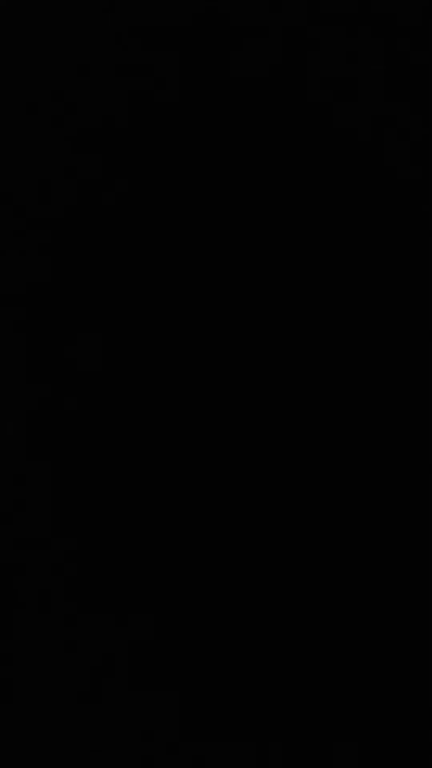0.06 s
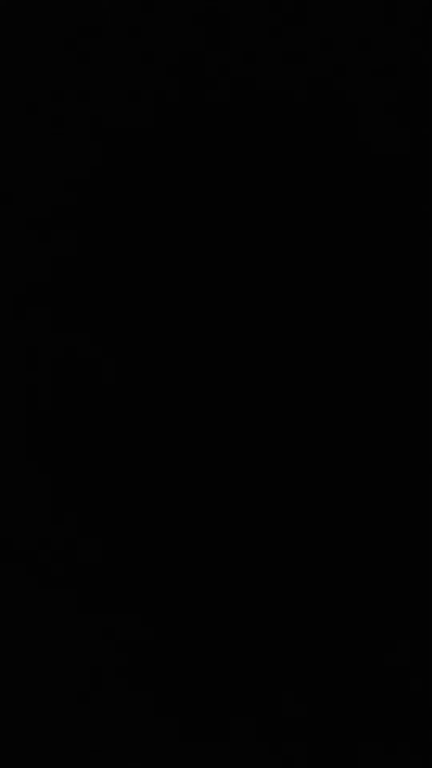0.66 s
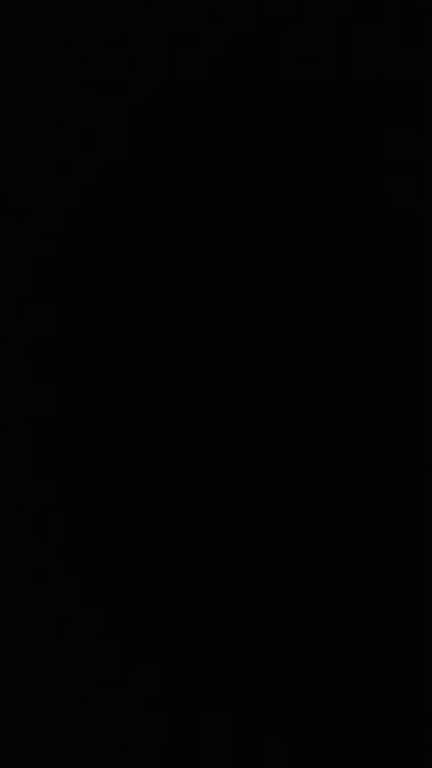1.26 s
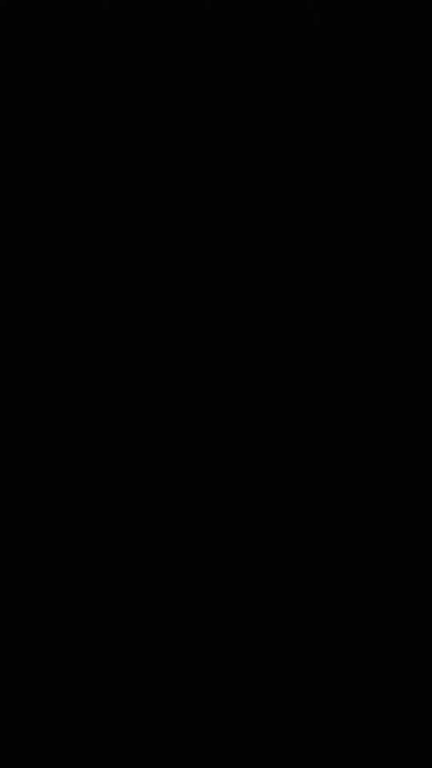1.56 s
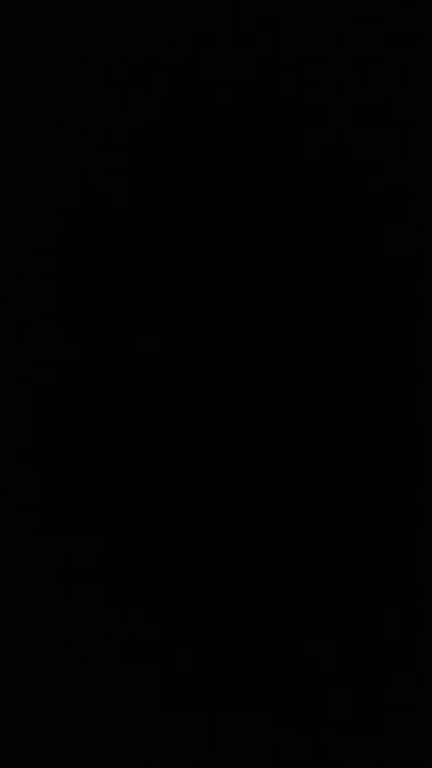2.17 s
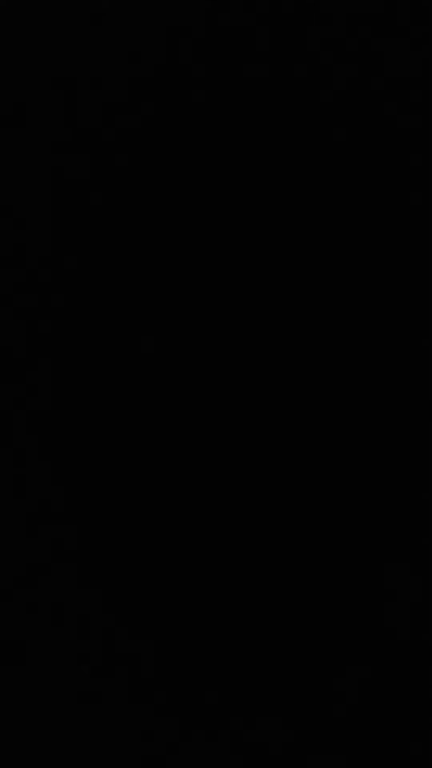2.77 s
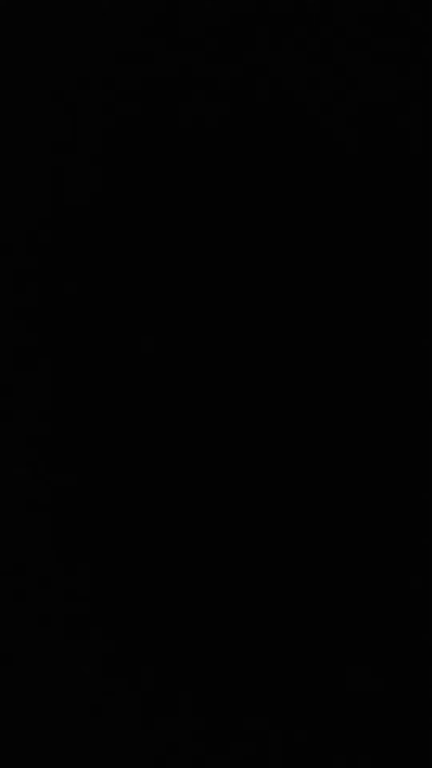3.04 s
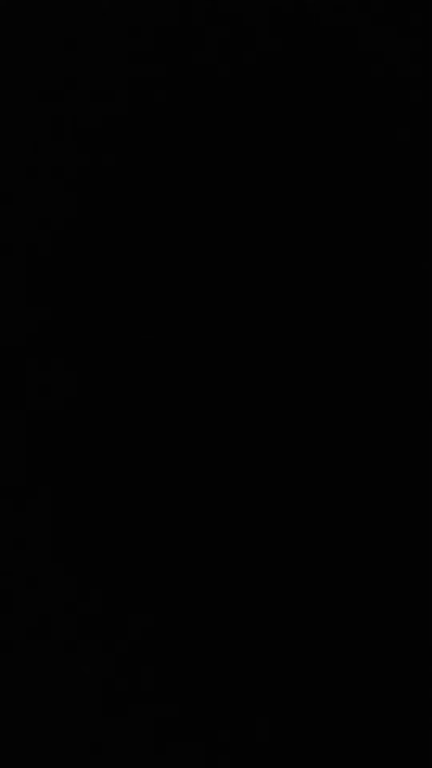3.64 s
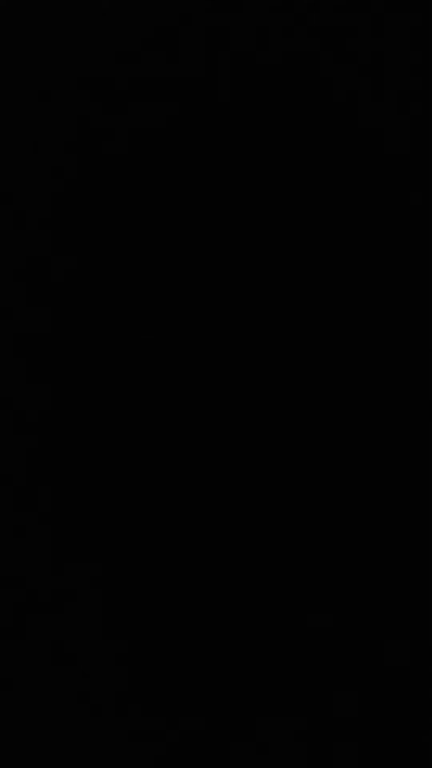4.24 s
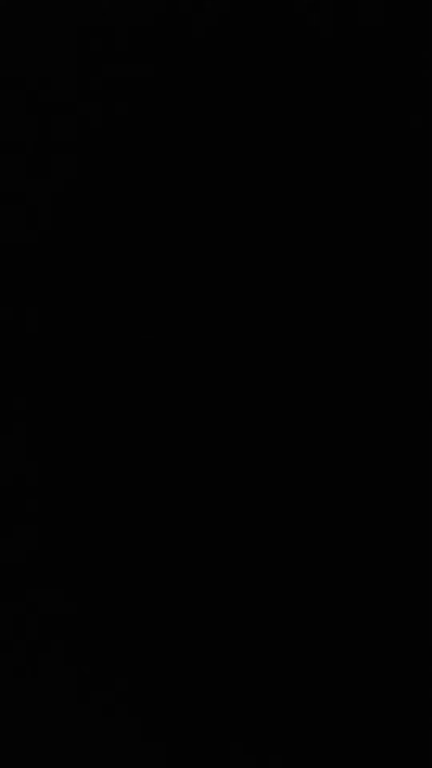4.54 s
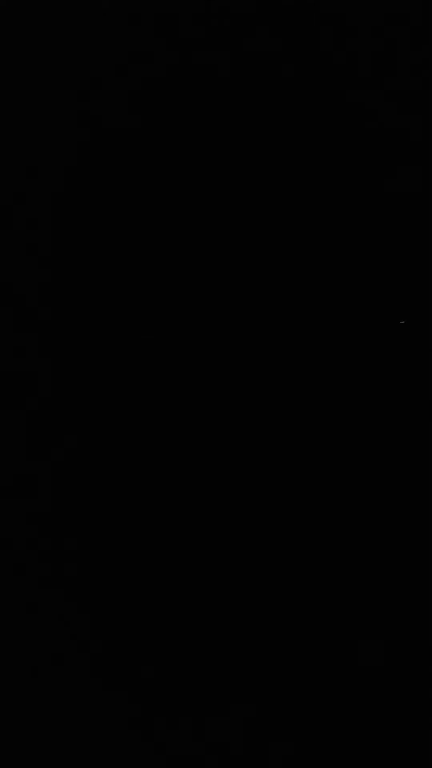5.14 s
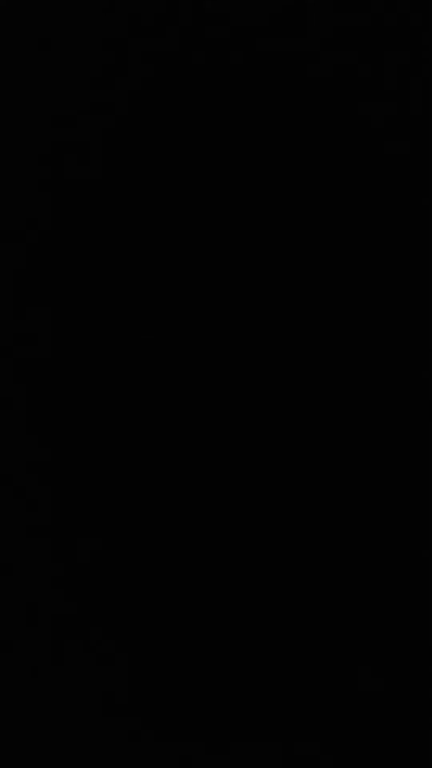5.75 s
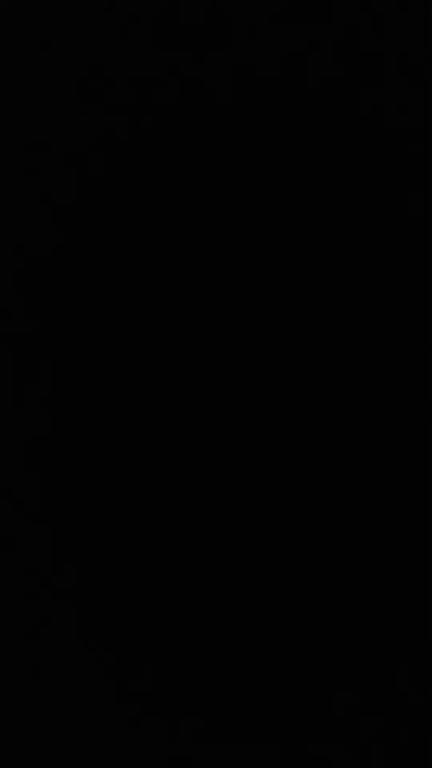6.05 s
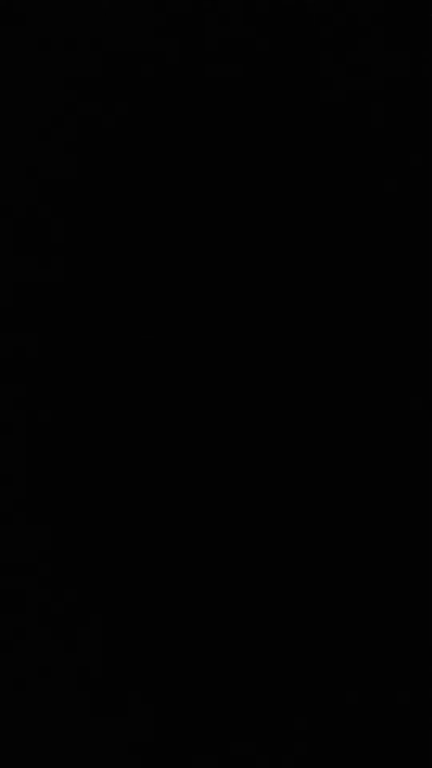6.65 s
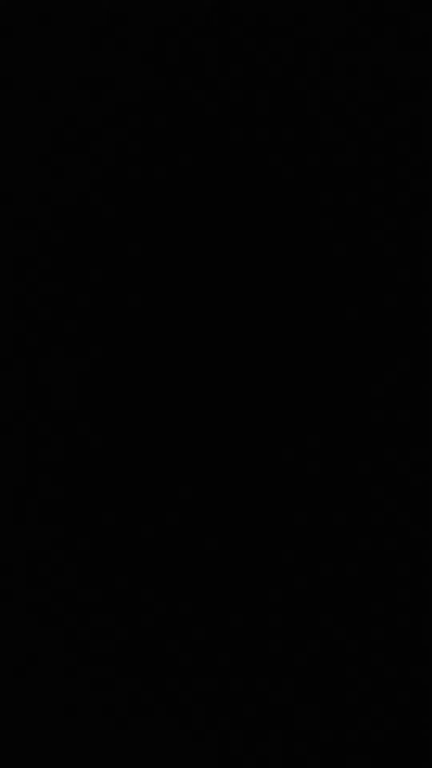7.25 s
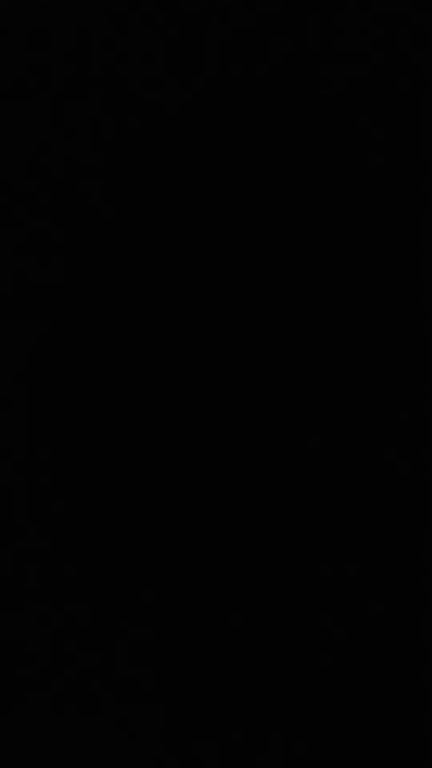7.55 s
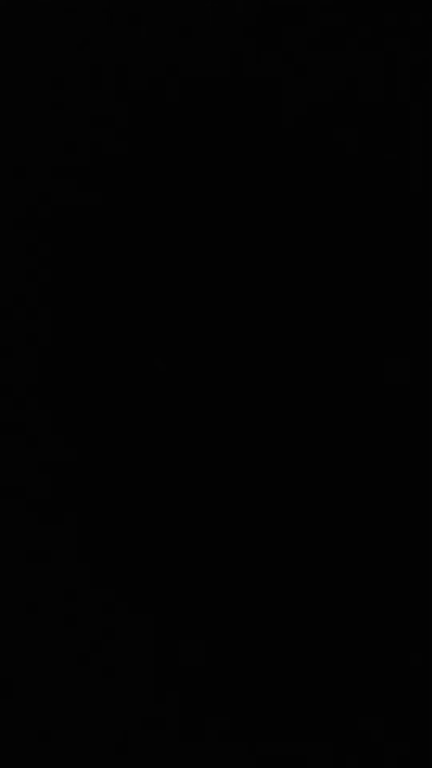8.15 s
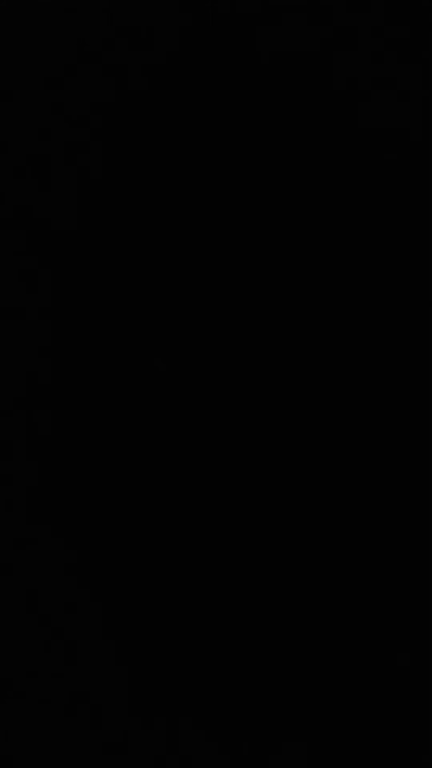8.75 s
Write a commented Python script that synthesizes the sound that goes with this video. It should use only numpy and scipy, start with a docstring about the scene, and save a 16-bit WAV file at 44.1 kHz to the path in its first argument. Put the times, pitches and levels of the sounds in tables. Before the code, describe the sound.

A dense, shrill chorus of crickets at night, with katydids rasping and a nearer insect buzzing in quick pulses.

```python
"""Summer night at a wood's edge.

Three cricket choruses, wings ringing at each stroke, merge into shrill bands. Katydids scrape: far ones
in hoarse syllables, others in high lisps and fizz. A nearer insect buzzes in phrases; one cricket trills.
Trees scatter the calls. Underneath: faint rumble, hum, a wash of far insects and a thin whine."""
import sys
import numpy as np
from scipy import signal
from scipy.fft import rfft, irfft, next_fast_len
from scipy.io import wavfile

SR = 44100
rng = np.random.default_rng(int(sys.argv[2]) if len(sys.argv) > 2 else 0)


def bounce(signal):
    """Save signal as a 16-bit WAV file at the path given by the first command-line argument."""
    frames = np.transpose(np.atleast_2d(signal))
    limited = np.clip(frames, -1, 1)
    pcm = np.round(limited * 32767).astype(np.int16)
    wavfile.write(sys.argv[1], SR, pcm)


N = 392931
TIME_S = np.arange(N) / SR

# Spectra. Each row: frequency in Hz, relative density in dB.
AIR_SPECTRUM = [(25, -31), (95, -38), (150, -15.5), (200, -10), (330, -2.5), (550, 2), (900, 0.5),
                (1250, -4.5), (1700, -3), (3000, -4.5), (9500, -18), (12500, -16), (15500, -15)]
FAR_INSECT_SPECTRUM = [(1200, -34), (1750, -5.5), (2050, -1.5), (2300, -7), (3000, 6), (3400, -1.5),
                       (4200, 2.5), (4700, -2.5), (5400, -6), (6400, -11), (7800, -5.5), (8500, -10.5),
                       (9100, -24), (11000, -40)]
FIZZ_WING_SPECTRUM = [(9000, -30), (12500, -11), (14000, 2), (15200, 1), (16000, -18)]
LISP_WING_SPECTRUM = [(7000, -28), (8400, 0), (9500, -7), (10500, -11), (11500, -14), (13500, -24),
                      (16000, -26)]
RASP_WING_SPECTRUM = [(1000, -37.5), (1500, -16.5), (1800, -7), (1950, -3.5), (2060, 1), (2190, -8.5),
                      (3200, -9.5), (4500, -14.5), (6000, -23), (8000, -38)]
BUZZ_WING_SPECTRUM = [(2500, -50), (3400, 0.5), (4200, -11), (4600, 5), (4900, 2.5), (5450, 0.5),
                      (5900, -5), (6500, -17), (8000, -36)]
# Slow swells as singers join and drop out. Each row: time in seconds, relative level in dB.
FIZZ_LEVELS = [(0, -82), (1.4, -80), (2.5, -73), (4.6, -74.5), (5.2, -88), (6, -84), (6.3, -76),
               (8.91, -86)]
TRILL_LEVELS = [(0, -64), (1.6, -61), (3.3, -61.5), (4.9, -69), (5.8, -71), (7.6, -61), (8.91, -60.5)]
HIGH_CHORUS_LEVELS = [(0, -59.5), (.8, -57), (2.2, -57.8), (4.9, -56.5), (8.91, -58)]
MID_CHORUS_LEVELS = [(0, -49.5), (.8, -52), (1.7, -52), (4.45, -49.5), (4.7, -52), (4.95, -48), (6.5, -49),
                     (6.9, -51.3), (8.91, -51.5)]
LOW_CHORUS_LEVELS = [(0, -40), (.4, -39.5), (.7, -42.5), (1.0, -39), (1.35, -40), (1.6, -42.5), (2.3, -41),
                     (2.75, -39.5), (3.6, -41), (4.45, -39.5), (4.9, -41.5), (5.9, -41.5), (7.1, -40),
                     (8.5, -40.2), (8.91, -39.5)]
# Far hum. Each row: frequency in Hz, level in dB.
HUM_TONES = [(588, -74), (832, -80)]
# Bursts of scraping. Each row: centre in seconds, length in seconds, relative level in dB.
KATYDID_LISPS = [(.83, .44, -64.5), (1.718, 0.29, -64), (2.59, 0.29, -66), (3.337, 0.32, -65.5),
                 (4.452, .26, -64.5)]
BUZZ_PHRASES = [(.33, .32, -51.8), (.74, 0.18, -50), (1.06, .12, -52.5), (1.25, .16, -50),
                (1.58, .18, -50.7), (2.0, .26, -50.5), (2.42, .24, -50), (2.82, 0.2, -51),
                (3.1, .14, -51.5), (3.32, .15, -50.3), (3.66, .16, -49.8), (3.93, .14, -50),
                (4.13, .2, -51.8), (4.48, 0.21, -50.5), (4.87, .2, -49.7), (5.21, 0.2, -48.2),
                (5.44, .1, -52), (5.71, 0.23, -49), (6.11, .22, -49.5), (6.43, .22, -49.7),
                (6.83, .34, -49), (7.33, .16, -51), (7.66, .22, -51), (7.96, .12, -53), (8.19, .24, -51.5),
                (8.54, 0.22, -51), (8.82, 0.22, -51)]
# Far calls. Each row: first and last syllable in seconds, relative level in dB, growth in dB.
KATYDID_CALLS = [(.165, .5, -55.5, -7), (0.656, .785, -54.8, 0), (1.0, 1.23, -56, 2),
                 (1.54, 1.656, -52.3, 1), (1.965, 2.067, -53.7, -1.5), (2.25, 2.56, -56.5, 4),
                 (2.68, 2.79, -60, 0), (2.906, 3.11, -55.5, -1), (3.27, 3.51, -55.3, 3),
                 (3.64, 3.975, -55.5, 8), (4.29, 4.62, -55.5, -2.5), (4.76, 4.87, -55.3, 6),
                 (5.115, 5.31, -53.2, 1), (5.548, 5.738, -53.8, 5), (6.065, 6.434, -54.3, -7),
                 (6.678, 6.778, -51.5, 0), (7.087, 7.345, -54.3, -1.5), (7.546, 7.64, -53.5, 0),
                 (7.92, 8.21, -55, -1), (8.36, 8.57, -56, 3), (8.762, 8.89, -55, -1)]


def gain(db):
    """Decibels to amplitude."""
    return 10 ** (np.asarray(db) / 20)


def unit_rms(x):
    """Scales to unit rms."""
    return x / np.sqrt(np.mean(x ** 2) + 1e-20)


def follow_levels(x, levels):
    """Normalises, then applies a slow level curve."""
    return unit_rms(x) * gain(np.interp(TIME_S, *np.transpose(levels)))


def coloured(x, spectrum):
    """Filters by a spectrum interpolated in log frequency; unit rms."""
    hz, db = np.transpose(spectrum)
    size = next_fast_len(N)
    shape_db = np.interp(np.log(np.fft.rfftfreq(size, 1 / SR) + 1), np.log(hz), db)
    return unit_rms(irfft(rfft(x, size) * gain(shape_db), size)[:N])


def drift(points):
    """Random wander through evenly spaced points."""
    return np.interp(TIME_S, np.linspace(0, TIME_S[-1], points), rng.standard_normal(points))


def swell(centre_s, length_s):
    """Half-cosine bump."""
    return np.cos(np.pi * np.clip((TIME_S - centre_s) / length_s, -.5, .5))


def strokes(rate_hz, duty, wander):
    """Wing strokes: the scraper's progress along the file, 0-1, and its pressure."""
    cycles = rng.random() + np.cumsum(rate_hz * (1 + wander * drift(points=24))) / SR
    progress = np.minimum(cycles % 1 / duty, 1)
    return progress, 4 * progress * (1 - progress)


def scrape(spectrum, rate_hz, duty, wander):
    """Each stroke is a rush of tooth strikes through a broadly tuned wing."""
    _, pressure = strokes(rate_hz, duty, wander)
    return coloured(pressure * rng.standard_normal(N), spectrum)


def woods(x, wet_db, t60_s, paths=7):
    """Adds echoes from trunks and leaves; paths crossfade as the air stirs."""
    delay_s = np.arange(SR // 2) / SR
    decay = gain(-60 * delay_s / t60_s)
    crossfade = np.cumsum(np.exp(.5 * drift(points=30))) * paths / SR
    echoes = np.zeros(N)
    for path in range(paths):
        strengths = rng.standard_normal(len(delay_s))
        arrivals = rng.random(len(delay_s)) < 2000 / SR  # 2000 echoes a second
        taps = strengths * arrivals * decay
        share = np.sin(np.pi / 2 * np.minimum((crossfade + path) % paths, 2))
        echoes += signal.oaconvolve(x * share, taps / np.linalg.norm(taps))[:N]
    return (x + gain(wet_db) * echoes) / np.hypot(1, gain(wet_db))


def background():
    """Far rumble and microphone hiss, countless far insects, a wavering hum, a whine that drops 6 dB."""
    air = gain(-58) * coloured(rng.standard_normal(N), AIR_SPECTRUM)
    insects = gain(-48.5) * coloured(rng.standard_normal(N), FAR_INSECT_SPECTRUM)
    insects *= gain(.3 * drift(points=90))
    hum = np.zeros(N)
    for hz, db in HUM_TONES:
        amplitude = gain(db + 1.5 * drift(points=20))
        hum += amplitude * np.sin(2 * np.pi * np.cumsum(hz + 2 * drift(points=60)) / SR)
    whine = gain(np.interp(TIME_S, [3, 5], [-84, -90])) * np.sin(2 * np.pi * 14000 * TIME_S)
    return air + insects + hum + whine


def high_katydids():
    """High-tuned wings: five soft lisps, and two bouts of fizz at the top of hearing."""
    effort = sum(gain(db) * swell(centre_s, length_s) for centre_s, length_s, db in KATYDID_LISPS)
    lisps = effort * scrape(LISP_WING_SPECTRUM, rate_hz=150, duty=1, wander=.096)
    fizz = scrape(FIZZ_WING_SPECTRUM, rate_hz=33, duty=.97, wander=.008)
    fizz = follow_levels(woods(fizz, wet_db=-10, t60_s=.25), FIZZ_LEVELS)
    return gain(1) * woods(lisps, wet_db=6, t60_s=.4) + gain(-3) * fizz


def cricket_trill():
    """One small wing rings, falling in pitch each stroke; the trill fades midway and returns."""
    progress, pressure = strokes(rate_hz=55.3, duty=.6, wander=.01)
    hz = 8220 + 420 * (.5 - progress) + 170 * drift(points=5000)
    wing = pressure * np.sin(2 * np.pi * np.cumsum(hz) / SR)
    return gain(-1) * follow_levels(woods(wing, wet_db=1, t60_s=.3), TRILL_LEVELS)


def far_katydids(spacing_s=.11, syllable_s=.097):
    """Scraped syllables in runs of two to four that grow, hold or fade, blurred by distance."""
    effort = np.zeros(N)
    for first_s, last_s, db, growth_db in KATYDID_CALLS:
        span_s = last_s - first_s
        for along in np.linspace(0, 1, 1 + round(span_s / spacing_s)):
            effort += gain(db + growth_db * (along - .5)) * swell(first_s + along * span_s, syllable_s)
    wing = scrape(RASP_WING_SPECTRUM, rate_hz=170, duty=.96, wander=.25)
    return gain(1.9) * woods(effort * wing, wet_db=-2, t60_s=.46)


def near_insect(fade_s=.1):
    """Fast wing strokes: a soft steady buzz that swells into about three phrases a second."""
    floor = gain(-55.5)
    effort = np.full(N, floor)
    for centre_s, length_s, db in BUZZ_PHRASES:
        gate = np.clip(.5 + (length_s / 2 - abs(TIME_S - centre_s)) / fade_s, 0, 1)
        effort += gate * (gain(db) - floor)
    wing = scrape(BUZZ_WING_SPECTRUM, rate_hz=65.5, duty=.89, wander=.0252)
    return gain(-1.3) * effort * unit_rms(woods(wing, wet_db=1.8, t60_s=.3))


def chorus(centre_hz, spread_hz, sag_hz, scatter_hz, base_rate_hz, duty, edge_db, count):
    """Each cricket's wing rings at its own pitch, sagging through a stroke; outer pitches are fainter."""
    voices = np.zeros(N)
    for offset in np.linspace(-1, 1, count):
        progress, pressure = strokes(base_rate_hz * rng.uniform(.65, 1.2), duty, wander=.13)
        # Each stroke rings afresh: new phase, slightly off pitch.
        stroke_index = np.cumsum(np.diff(progress, prepend=0) < 0)
        detune, start_cycles = rng.standard_normal((4000, 2))[stroke_index % 4000].T
        hz = centre_hz + spread_hz * offset + sag_hz * (.5 - progress) + scatter_hz * detune
        ring = np.sin(2 * np.pi * (np.cumsum(hz) / SR + start_cycles))
        voices += gain(edge_db * offset ** 2) * pressure * ring
    return voices


def crickets():
    """A loud low chorus and two fainter, higher ones, scattered by the trees."""
    low = chorus(centre_hz=2696.6, spread_hz=155, sag_hz=99.9, scatter_hz=28,
                 base_rate_hz=68, duty=.7, edge_db=-11, count=13)
    mid = chorus(centre_hz=3797, spread_hz=165, sag_hz=200.1, scatter_hz=60,
                 base_rate_hz=55, duty=.45, edge_db=-5.5, count=9)
    high = chorus(centre_hz=7267, spread_hz=240, sag_hz=280.7, scatter_hz=69.97,
                  base_rate_hz=90, duty=.7, edge_db=-9.5, count=9)
    return (gain(.05) * follow_levels(woods(low, wet_db=-6, t60_s=.93), LOW_CHORUS_LEVELS)
            + gain(-.15) * follow_levels(woods(mid, wet_db=-2, t60_s=.72), MID_CHORUS_LEVELS)
            + gain(1) * follow_levels(woods(high, wet_db=-3, t60_s=.52), HIGH_CHORUS_LEVELS))


def scene():
    """All singers over the night air, in mono."""
    singers = crickets() + far_katydids() + near_insect() + cricket_trill() + high_katydids()
    return (singers + background())[None]


def record(dry):
    """Steep low-pass band limit."""
    cutoff_hz = 15730
    taps = signal.firwin(1023, cutoff_hz, window=("kaiser", 9), fs=SR)
    return signal.oaconvolve(dry, taps[None], "same")


dry = scene()
out = record(dry)
bounce(out)
```